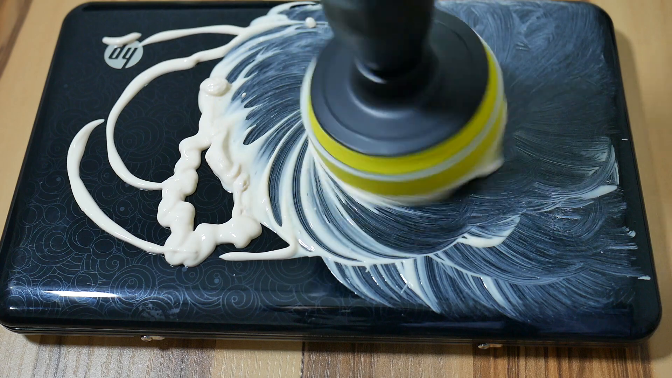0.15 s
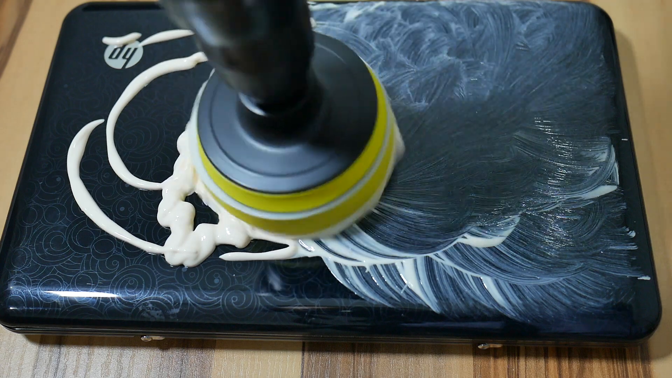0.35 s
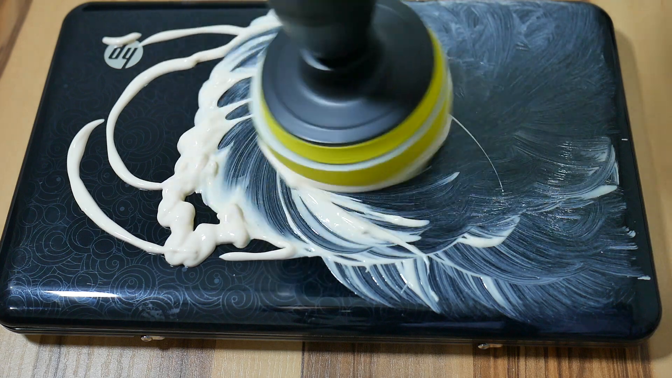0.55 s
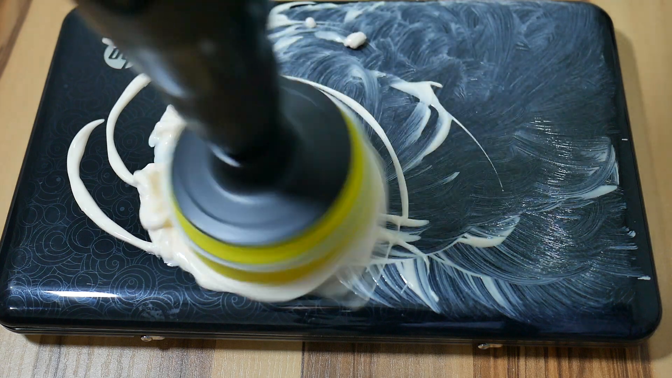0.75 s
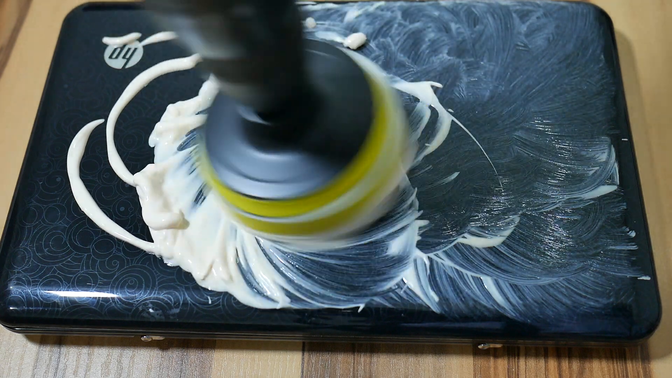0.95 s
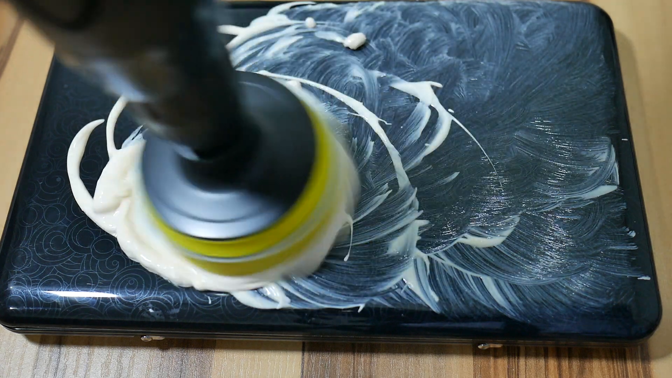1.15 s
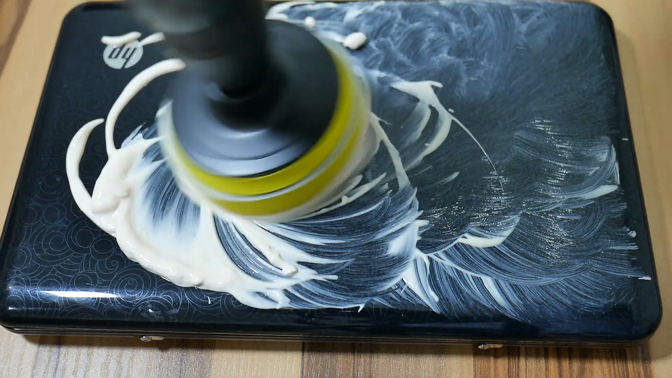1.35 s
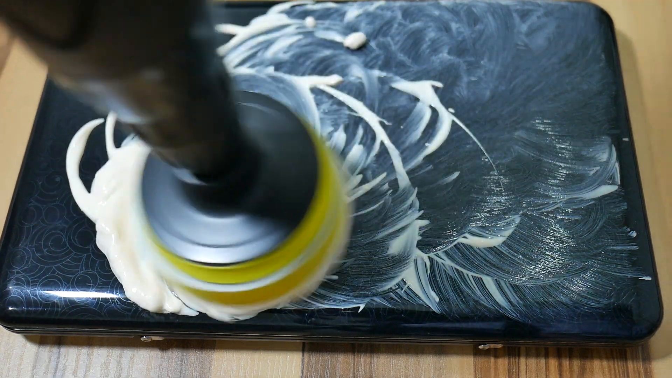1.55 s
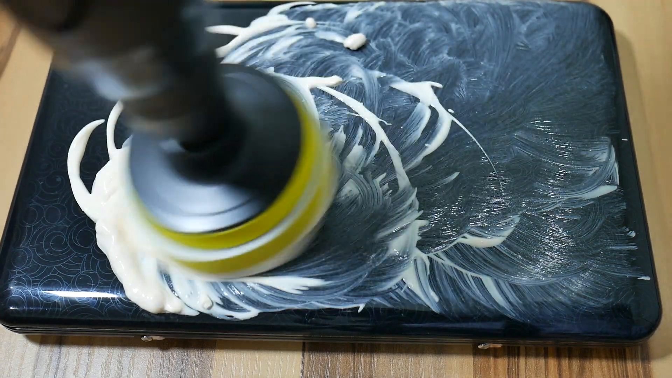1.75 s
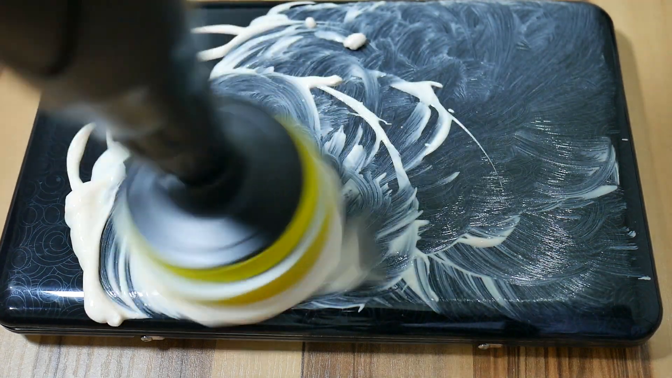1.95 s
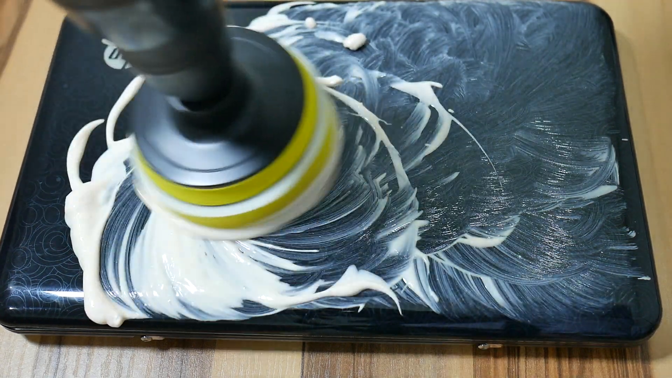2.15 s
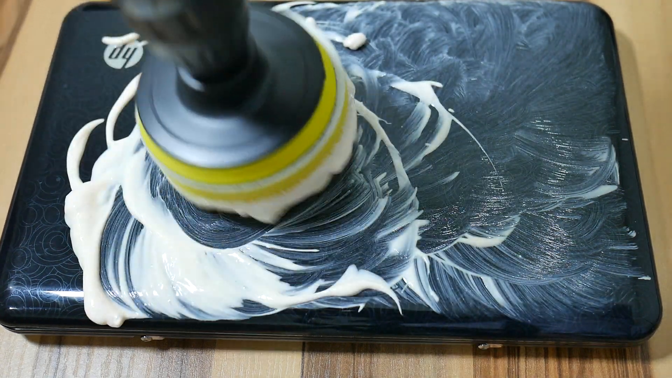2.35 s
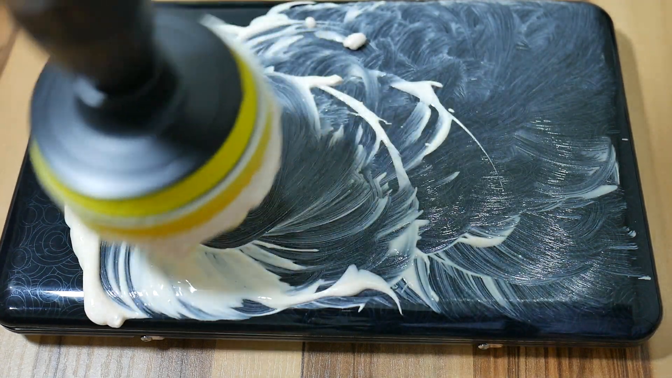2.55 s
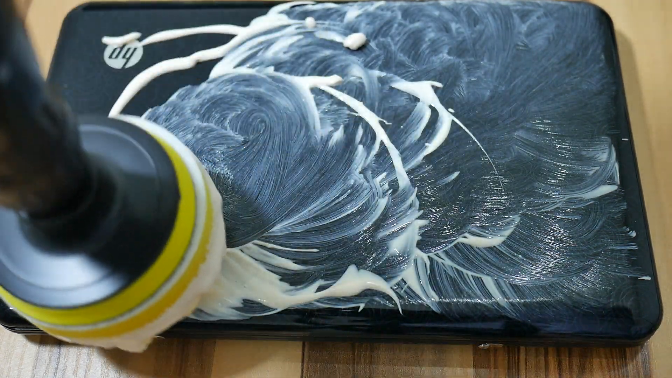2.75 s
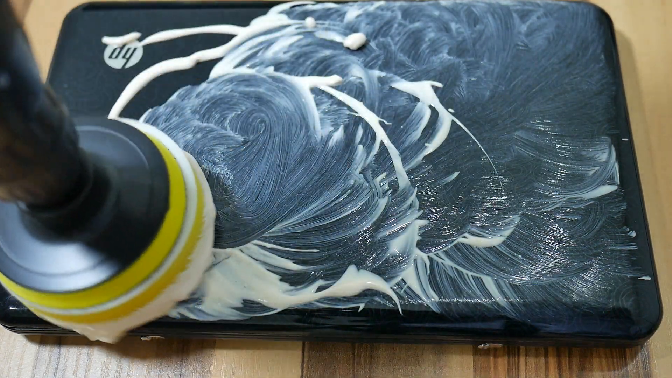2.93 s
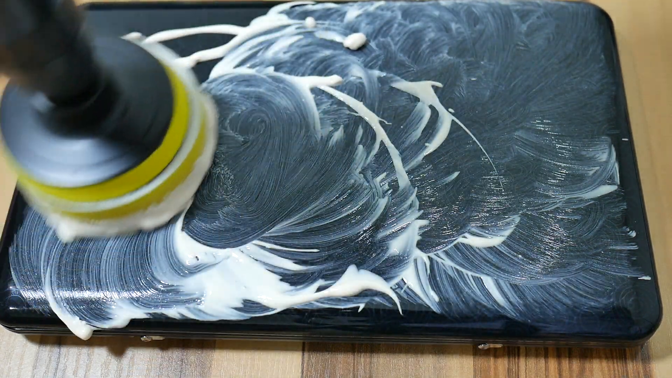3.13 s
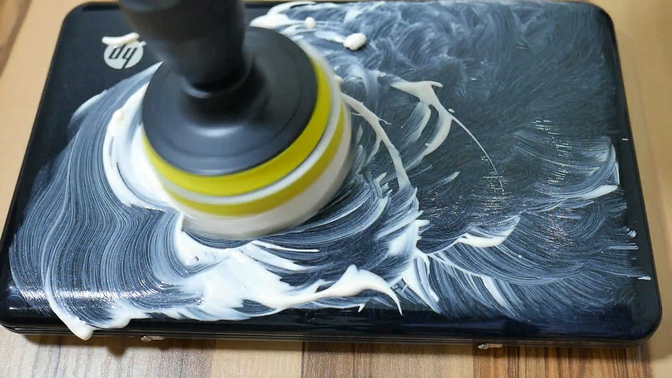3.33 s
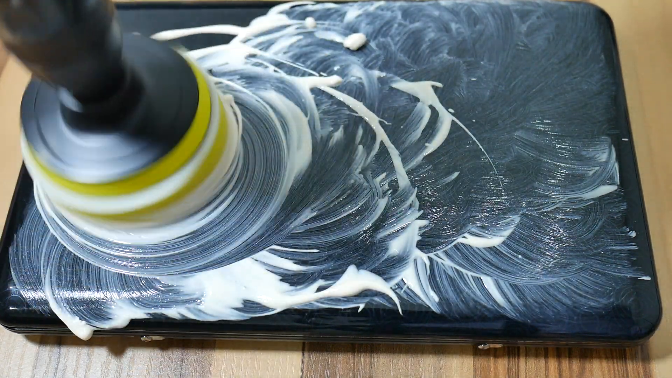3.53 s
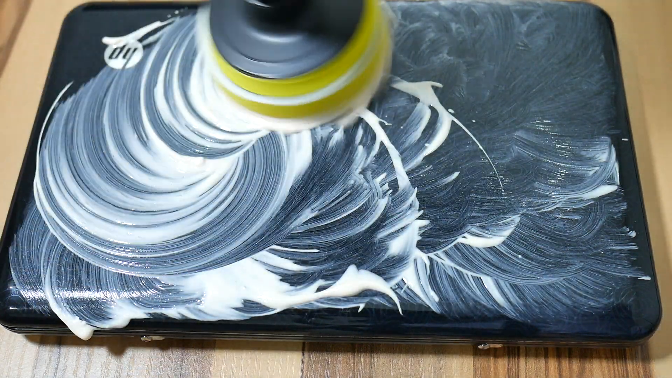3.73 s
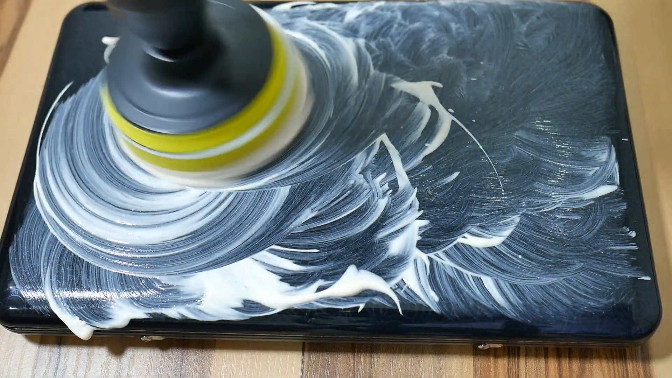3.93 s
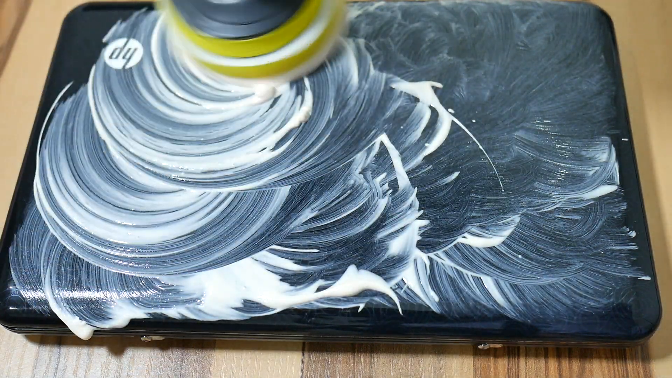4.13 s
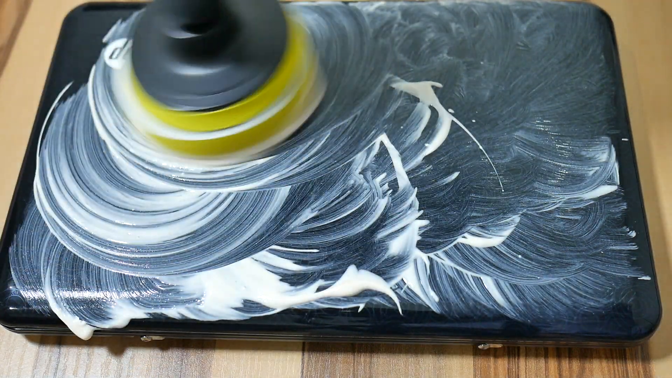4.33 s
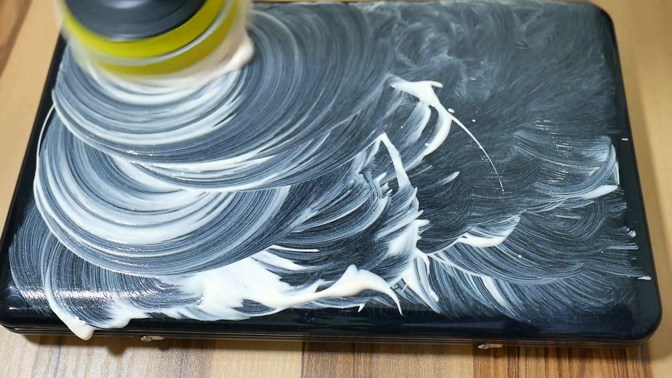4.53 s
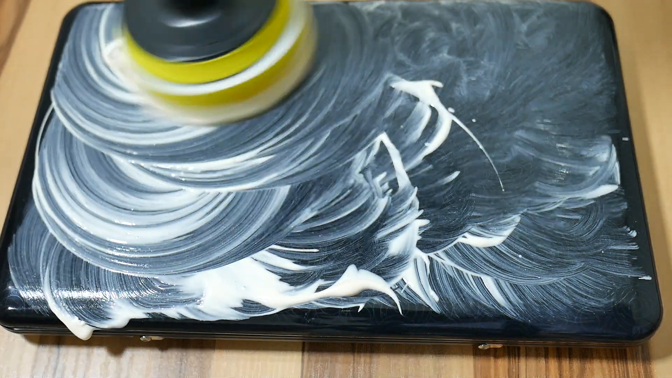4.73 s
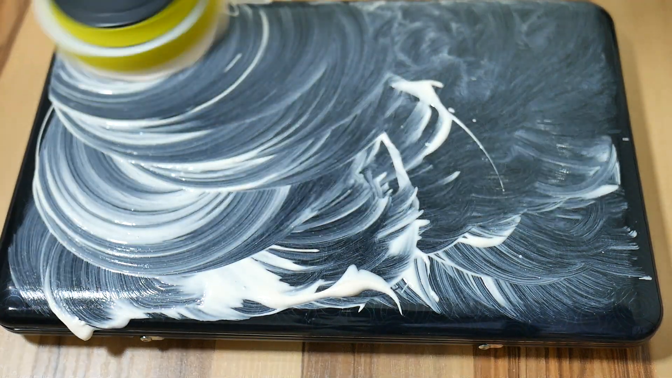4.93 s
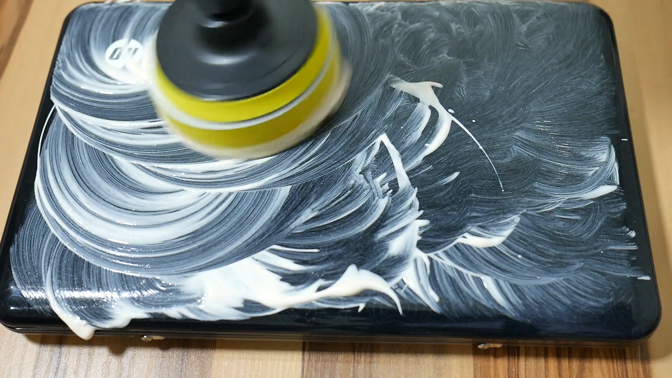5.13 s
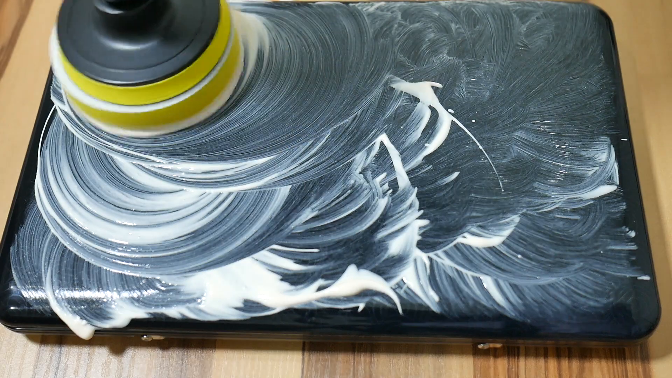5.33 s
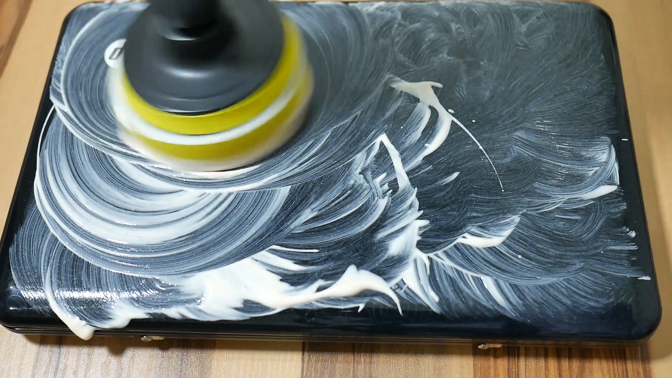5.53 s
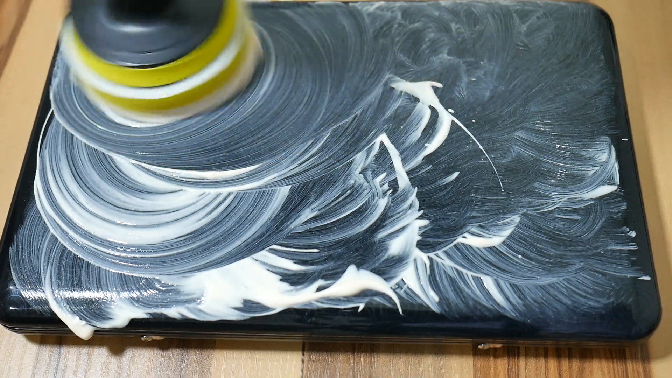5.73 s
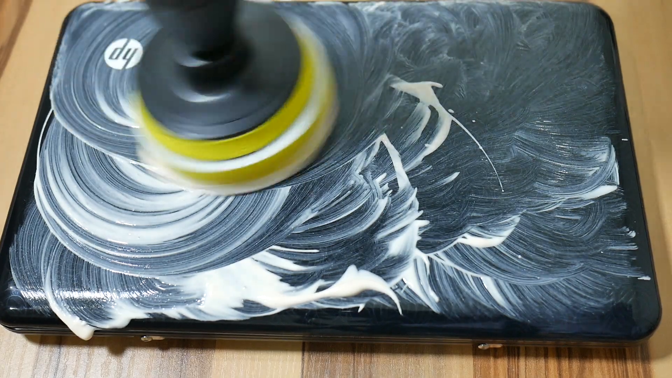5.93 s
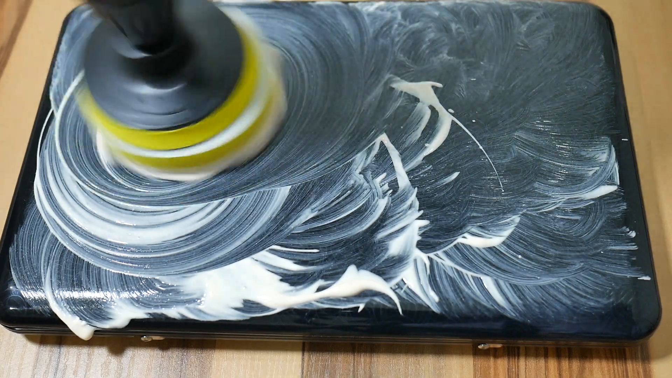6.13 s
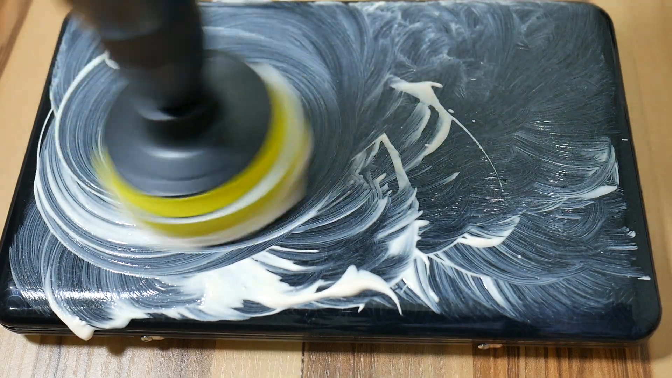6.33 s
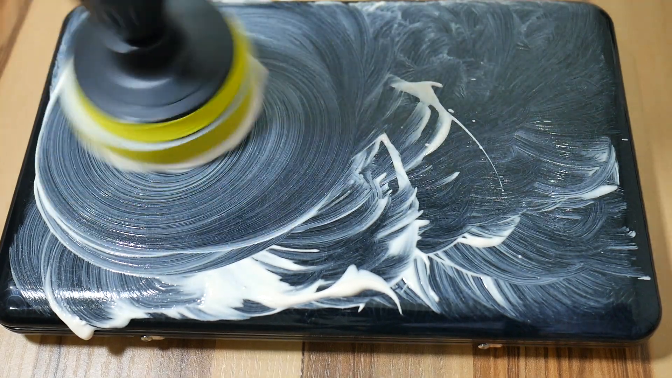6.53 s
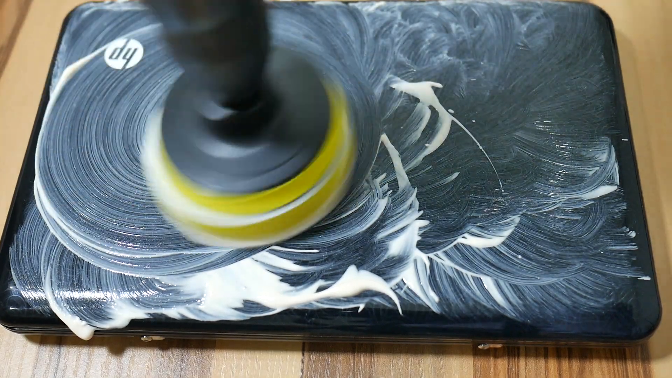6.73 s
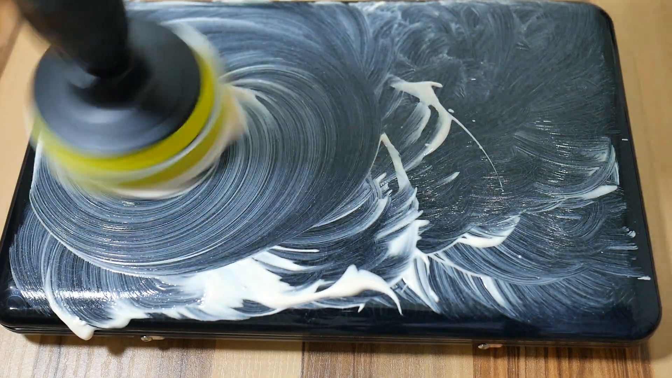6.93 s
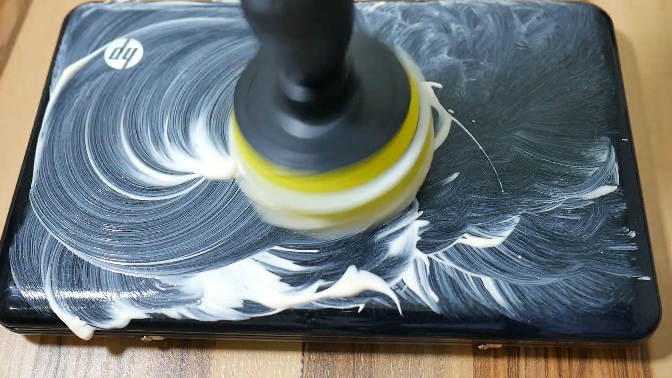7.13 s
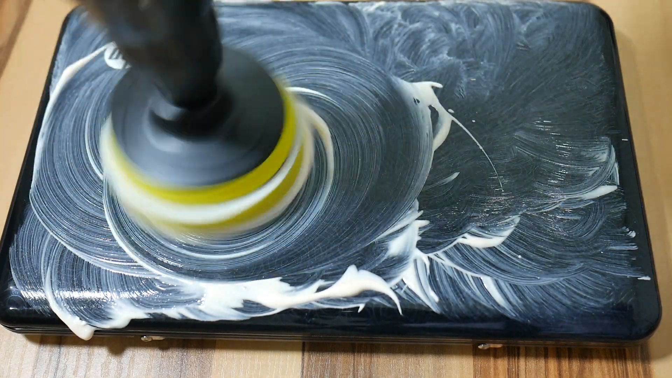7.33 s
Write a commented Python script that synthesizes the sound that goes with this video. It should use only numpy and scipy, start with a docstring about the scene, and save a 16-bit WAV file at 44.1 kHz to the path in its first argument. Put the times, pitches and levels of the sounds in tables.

```python
"""A quiet workshop, stereo microphone close to the bench. A cordless drill spins a foam pad through
polishing paste on a plastic lid. The planetary gearbox whines and rattles, the motor hums, its brushes
and the pad hiss; the speed follows the trigger and sags as the hand leans on the pad. Midway the drill
runs down, clicks, creeps for a moment and starts again at full speed."""
import sys
import numpy as np
from scipy import signal
from scipy.fft import rfft, irfft, next_fast_len
from scipy.io import wavfile
from scipy.ndimage import uniform_filter1d

SR = 44100
rng = np.random.default_rng(int(sys.argv[2]) if len(sys.argv) > 2 else 0)


def digitize_waveform(pressure):
    """Quantize a signal to 16-bit integers and store it at the path in sys.argv[1].

    Rows of a 2-D input are taken as channels; values are limited to [-1, 1].
    """
    field = np.atleast_2d(pressure).T
    bounded = np.clip(field, -1, 1)
    quanta = np.round(bounded * 32767).astype(np.int16)
    wavfile.write(sys.argv[1], SR, quanta)


N = 329868

# gear pitch set by the trigger, before and after the stop: time_s, pitch_hz
FIRST_RUN = [(0, 960), (.182, 971), (.215, 817), (.26, 756), (.57, 748), (.615, 862), (.655, 954),
             (.8, 969), (.975, 982), (1.005, 842), (1.07, 802.5), (1.17, 754), (2.235, 744.2), (2.295, 596),
             (2.38, 541), (2.45, 445)]
SECOND_RUN = [(3.255, 143.2), (3.275, 269.2), (3.295, 544), (3.31, 755), (3.34, 973), (3.37, 1081),
              (3.42, 1123), (3.53, 1105), (3.62, 1112), (3.85, 1098), (5.125, 1085), (5.19, 952.5),
              (5.24, 798.5), (5.31, 746.4), (6.445, 740.8), (6.48, 609), (6.52, 543), (6.695, 535),
              (6.735, 832), (6.85, 1052), (7.1, 1080), (7.25, 1086), (7.34, 949), (7.48, 937)]
# the hand leans on the pad once a stroke: middle_s, length_s, sag_hz (at SLOW_HZ), firmness (0-1)
HAND_PRESSES = [(0.399, 0.29, 33, 0.23), (1.124, 0.17, 6.5, 0.07), (1.516, 0.34, 28.7, 0.42),
                (1.895, 0.44, 18.2, 0.63), (2.211, 0.21, 13.1, 0.74), (3.623, 0.37, 24.5, 1),
                (3.777, 0.17, 22.6, 0.9), (4.078, 0.35, 32, 0.9), (4.491, 0.42, 44.6, 0.43),
                (4.859, 0.15, 14.5, 0.47), (5.379, 0.34, 31, 0.75), (5.691, 0.45, 32.5, 0.89),
                (6.152, 0.4, 33.4, 0.91), (6.432, 0.21, 15.1, 0.61), (6.95, 0.32, 34.4, 1),
                (7.295, 0.11, 19.7, 0.98)]
# tooth harmonics two to seven: level_db, surge_change_db, sideband_share (0-1)
TOOTH_HARMONICS = [(-40, -2.5, 0.38), (-40.5, -11.5, 0.18), (-44, -17, 0.26), (-43, 0.5, 0.42),
                   (-45.5, 0.5, 0.67), (-47, -27, 0.7)]
# harmonics two to six rise and fall against the rest: time_s, gain_db
BALANCE_2 = [(0, -3), (.15, -1), (.25, -10), (.52, -6), (.62, -8), (.9, -1), (1.25, -8), (1.5, -1.5),
             (2.3, -0.5), (3.33, 3.5), (3.45, -5.5), (4.6, -3.5), (5.1, -0.5), (5.35, -4), (5.5, 2),
             (6.4, 1.5), (6.6, -7), (6.76, 3.5), (6.9, -7), (7.05, -8), (7.17, 2.5), (7.3, -5), (7.48, 0)]
BALANCE_3 = [(0, 1), (.18, 2.5), (.25, -3), (.53, 6), (.65, -1), (.95, 0), (1.05, -0.5), (1.25, 2),
             (1.5, 1), (2.2, -1.5), (2.33, 5.5), (3.3, -1), (3.41, -2), (3.53, 0.5), (4.28, 1), (4.42, 5.5),
             (4.58, 8), (4.68, -9), (4.8, 3), (4.93, 7), (5, -10), (5.17, -12), (5.23, 3.5), (5.35, -6),
             (5.65, 4.5), (5.85, -10), (6.05, -3), (6.35, -1), (6.46, -8), (6.55, -1), (6.7, -1), (6.8, -5),
             (6.88, 8.5), (7.08, 2.5), (7.28, 5.5), (7.38, -1), (7.48, 3)]
BALANCE_4 = [(0, 3.5), (1.06, 2), (1.25, -4), (1.9, -9), (2.29, -0.5), (3.29, -5), (3.47, 6), (3.62, 8),
             (3.85, -2.5), (4.05, 1), (4.3, -2), (4.57, 8), (4.66, -19), (5.05, -11), (5.38, 4.5),
             (6.17, -0.5), (6.38, 9), (6.46, 0), (6.52, -16), (6.74, -15), (6.88, 11.5), (7.03, 7),
             (7.17, 12), (7.3, 7), (7.42, 0)]
BALANCE_5 = [(0, 0.5), (.21, 3.5), (.3, -4), (.55, -5), (.62, 3), (.7, 6), (.93, -3), (1.02, 6), (1.2, 0),
             (2.3, -2), (3.3, -4), (3.5, -6.5), (5.05, 4.5), (5.15, -3), (5.25, -9), (5.35, 1), (6.2, 1.5),
             (6.5, 2), (6.76, -7), (6.9, 1.5), (7.25, -3.5), (7.48, -2)]
BALANCE_6 = [(0, -5), (.25, -2), (.5, 4), (.62, -10), (.75, 5), (1, -5), (1.12, 7.5), (1.25, 0), (1.85, 6),
             (2.3, -3), (5.1, 5), (5.25, -6), (5.38, -1), (5.7, 0.5), (6.18, 3.5), (6.4, -2), (6.6, 6),
             (6.75, -5), (7, 0.5)]
# how strongly the gearbox radiates a tooth harmonic: frequency_hz, gain_db
GEARBOX_COLOUR = [(1100, -13.5), (1480, -4), (1950, 0), (2200, 0), (2430, 4), (2950, -4.5), (3280, 0),
                  (3700, -4.5), (3920, 0.5), (4420, -3.5), (4860, 4.5), (5200, 1.5), (5430, -3.5),
                  (5900, -9), (6800, -5.5), (7500, -4)]
# a full press shifts the whine into the upper middle: frequency_hz, gain_db
LOAD_COLOUR = [(1450, -6), (2150, -2), (2800, 11.5), (3500, 11), (4300, 13), (5000, 1.5), (5500, 13),
               (7500, -2)]
# weaker gear partials: gear_multiple, level_db (against the rattle)
GEAR_PARTIALS = [(1.025, -22.5), (8, -14), (9, -18), (10, -21)]
# resonances of the housing, and a narrow dip near 7.8 kHz: centre_hz, width_hz, gain_db
HOUSING_MODES = [(2134, 115, 2), (2645, 250, 1.5), (3270, 270, 1), (3770, 146, -0.5), (4200, 470, 6),
                 (5170, 1100, 6.5), (7230, 230, 6.5), (7800, 120, -11), (8030, 170, 5.5)]
# commutator hum: time_s, level_db
COMMUTATOR_HUM = [(0, -51), (1.2, -47), (2.15, -44.5), (2.3, -48), (3.3, -47), (4.2, -48), (5.1, -55.5),
                  (5.4, -49), (6.4, -53), (6.95, -49.5), (7.48, -52.5)]
# whine of the motor pinion: time_s, level_db
PINION_WHINE = [(0, -59), (1.3, -52), (1.9, -43.5), (2.3, -58), (3.29, -35), (3.42, -34.5), (4.45, -40.5),
                (4.62, -67), (5.2, -55), (5.4, -46.5), (6.35, -39.5), (6.6, -43.5), (7.15, -41), (7.3, -42),
                (7.4, -37.5)]
# armature and bearing tones: shaft_multiple, level_db (against the rattle, at top speed)
ARMATURE_TONES = [(1, -33), (1.6, -31.5), (4, -23), (4.2, -27.5), (5.05, -17.5), (6.03, -15), (11.27, -8),
                  (13.1, -15), (24.1, -16)]
# spectrum of the rubbing parts: frequency_hz, gain_db
RUB_COLOUR = [(71, -56), (150, -45), (250, -31.5), (345, -21), (430, -25.5), (500, -22.5), (585, -16),
              (640, -27), (740, -16.5), (1300, -12), (1900, -6), (2400, -5.5), (4000, -6.5), (4700, -12.5),
              (6500, -13), (8600, -19.5), (9600, -15), (12000, -16), (13000, -19), (15000, -21.5),
              (15800, -26)]
# friction in the first run, the stop and the second run: time_s, hiss_db, pad_db
FIRST_RUB = [(0.0, -40.5, -46.5), (0.49, -42.5, -44.5), (0.61, -39.5, -42.5), (0.94, -41.5, -45),
             (1.11, -41, -41), (1.27, -43, -46), (1.52, -40.5, -40), (1.72, -42.5, -44.5), (1.76, -38, -42),
             (1.97, -42, -39.5), (2.25, -39, -42.5), (2.29, -40.5, -37.5), (2.46, -56, -49.5),
             (2.5, -77, -65), (2.54, -72, -73)]
STOP_RUB = [(2.62, -80, -93), (2.9, -96.5, -82.5), (2.96, -85, -78), (3.0, -63, -56), (3.08, -61, -47.5),
            (3.145, -71, -60), (3.22, -81, -76)]
SECOND_RUB = [(3.238, -75, -54), (3.275, -43, -39), (3.295, -32.5, -26.5), (3.34, -32.5, -34.5),
              (3.43, -38, -37), (3.51, -35, -34), (4.41, -36, -38), (4.69, -40.5, -39.5),
              (4.98, -39.5, -39), (5.47, -40.5, -42), (5.51, -46, -44.5), (5.63, -39, -40.5),
              (5.83, -45.5, -45.5), (5.96, -42.5, -45), (6.0, -39, -41.5), (6.32, -43.5, -45.5),
              (6.44, -39.5, -41), (6.69, -44.5, -44.5), (6.77, -37.5, -46), (6.85, -37.5, -39.5),
              (7.18, -46, -45), (7.22, -40, -47.5), (7.46, -41, -45)]
# spectrum of the still room: frequency_hz, gain_db
AIR_COLOUR = [(25, -42), (42, -25), (56, -12), (80, -19), (130, -9), (213, -6.5), (430, -5), (560, -8.5),
              (2000, -30.5), (9500, -32), (15000, -55)]
# mains hum in the room: time_s, level_db
MAINS_HUM = [(0, -84.5), (2.2, -79.5), (2.5, -75.5), (3.2, -70), (3.6, -87.5), (6.5, -77), (7.48, -95)]
# short rasps, each in one resonance: middle_s, length_s, centre_hz, width_hz, level_db
RASP_SWELLS = [(0.377, .12, 5050, 800, -36), (1.5, 0.36, 5130, 700, -43), (1.851, .3, 4496, 900.4, -38),
               (2.15, .25, 5150, 700, -42), (4.851, .8, 7398, 450, -42), (5.677, 0.64, 7330, 350, -46.5),
               (6.25, 0.49, 7370, 350, -48), (6.925, .3, 7327, 300.9, -43)]
# gear overtones whistle up: middle_s, length_s, gear_multiple, blur_hz, level_db
WHISTLE_SWELLS = [(1.12, 0.33, 8.9, 120, -60), (1.95, 1, 9.2, 59.98, -48.5),
                  (2.121, 0.73, 7.65, 110, -50.5), (4.849, 0.55, 12, 419.7, -45),
                  (4.899, 0.62, 7, 199.4, -49.5), (4.899, 0.58, 8.8, 350, -44),
                  (5.638, 0.28, 15.1, 801, -43), (6.069, 0.25, 14.9, 800, -49), (6.395, .16, 15, 799, -51),
                  (6.5, 0.16, 11, 259.5, -39.5), (6.6, 0.18, 7.8, 70.3, -37),
                  (6.592, 0.12, 3.65, 50, -39.5), (6.86, 0.37, 11.5, 300, -46),
                  (7.15, .5, 11.25, 260.2, -47)]
# trigger, chuck and gear backlash: start_s, level_db, ring_hz
STOP_CLICKS = [(2.434, -27.5, 2390), (2.437, -21, 1230), (2.443, -25, 4080), (2.498, -37, 1730),
               (2.891, -37.5, 11100), (2.932, -37, 3920), (2.937, -32, 3300), (2.945, -49, 3300),
               (2.975, -36, 1130), (3.16, -38, 1413), (3.231, -29, 2784), (3.245, -29, 4120)]
# the motor creeps under a half-pressed trigger: time_s, whistle_db, scrape_db
CREEP_LEVELS = [(2.965, -130, -73), (2.98, -75, -67), (2.995, -72, -44), (3.03, -71, -52),
                (3.06, -73, -41.5), (3.095, -75, -41.5), (3.13, -92, -56), (3.22, -125, -67),
                (3.243, -63, -49), (3.275, -67, -33), (3.32, -130, -70)]
# what rings while it creeps: centre_hz, width_hz, gain_db
SCRAPE_MODES = [(1070, 65, -1.5), (1280, 210, -3), (2800, 280, -5), (4040, 230, -3)]
# reflections from bench and walls in the side signal: frequency_hz, gain_db
SIDE_COLOUR = [(60, 2), (200, -36), (400, -12), (700, -16.5), (1300, -16.5), (2400, -13), (4400, -19.5),
               (8000, -39), (15000, -18.5)]
# direct sound at the microphone, by frequency: frequency_hz, left_over_right_db
MIC_BALANCE = [(60, -3), (300, 5), (700, 4), (1200, 3), (2700, 6.5), (4200, 7), (6400, 6), (10000, 4.5),
               (15000, 6)]
# where the drill is, added to that balance: time_s, left_over_right_db
DRILL_PAN = [(0, -6), (.7, -4.5), (1.7, -4.5), (2.7, -4), (4, -5.5), (5.3, -5.5), (6.3, -5.5), (7.48, -6.5)]

SLOW_HZ = 750   # gear pitch at the slow working speed
SHAFT_PER_GEAR, CARRIER_PER_GEAR = 19 / 60, 1 / 15   # turns per cycle of the gear pitch
COMMUTATOR_BEATS, PINION_TEETH = 3, 12   # per shaft turn
FULL_SURGE_HZ_PER_S, FULL_SLACK_HZ_PER_S = 2620, 3700   # speeding up at full current; slowing, teeth loose


def from_db(db):
    """Decibels to amplitude."""
    return 10 ** (np.asarray(db) / 20)


def rms_one(x):
    """Scales x to rms 1."""
    return x / np.sqrt(np.mean(x ** 2) + 1e-20)


def in_time(rows):
    """Each column of a curve at every sample."""
    time_s, *columns = np.transpose(rows)
    return [np.interp(np.arange(N) / SR, time_s, column) for column in columns]


def at_hz(points, hz):
    """A spectrum read on a log-frequency axis."""
    points = np.array(points)
    return np.interp(np.log(hz + 1e-3), np.log(points[:, 0]), points[:, 1])


def coloured(x, gain):
    """Filters x by a gain given as a function of frequency."""
    size = next_fast_len(N + SR // 10)
    return irfft(rfft(x, size) * gain(np.arange(size // 2 + 1) * SR / size), size)[..., :N]


def drift(rate_hz):
    """Smooth random wander with spread 1."""
    pole = np.exp(-40 * np.pi * rate_hz / SR)
    slow = signal.lfilter([1], [1, -2 * pole, pole * pole], rng.standard_normal(N // 20 + 4002))[4000:]
    return np.interp(np.arange(N) / 20, np.arange(len(slow)), rms_one(slow))


def tone(turns, blur, blur_hz):
    """A partial of rms 1, a share of which is scattered into a narrow skirt."""
    blur = np.clip(blur, 0, 1)
    angle = 2 * np.pi * turns
    in_phase = np.sqrt(2 * (1 - blur)) + np.sqrt(blur) * drift(blur_hz)
    return in_phase * np.cos(angle) + np.sqrt(blur) * drift(blur_hz) * np.sin(angle)


def throb(turns, depth):
    """Swelling once a turn, never quite evenly; rms 1."""
    return rms_one(1 + depth * np.cos(2 * np.pi * (turns + .15 * drift(3))))


def swell(middle_s, length_s):
    """A smooth bump of height 1 around a moment."""
    return np.cos(np.pi * np.clip((np.arange(N) / SR - middle_s) / length_s, -.5, .5)) ** 2


def snaps(per_s, decay_s, size):
    """An envelope of small catches and sparks: each jumps up and dies away; rms 1."""
    kicks = (rng.random(N) < per_s / SR) * np.minimum(rng.exponential(1, N), 3)
    return rms_one(1 + size * signal.lfilter([1], [1, -np.exp(-1 / (decay_s * SR))], kicks + 1e-18))


def resonance(hz, centre_hz, width_hz):
    """A resonant peak of height 1."""
    return 1 / (1 + (2 * (hz - centre_hz) / width_hz) ** 2)


def housing_db(hz):
    """The resonances of the housing, and the narrow dip near 7.8 kHz, at these frequencies."""
    return sum(db * resonance(hz, centre_hz, width_hz) for centre_hz, width_hz, db in HOUSING_MODES)


def planets(carrier, share):
    """The circling planets move a share of a line into two close sidebands, which beat; rms 1."""
    return np.sqrt(1 - share) + 1j * np.sqrt(2 * share) * np.cos(np.pi * carrier + .6 * drift(3))


def gears(turns, pitch_hz, load, surge, slack, fade_db, rattle_db):
    """Tooth contacts whine; play in the teeth makes the lines rasp, a firm press cleans them."""
    play = np.maximum(slack, surge)
    turns = turns + 0.013 * drift(61) + 0.041 * play * drift(76)
    carrier = turns * CARRIER_PER_GEAR
    effort_db = fade_db + 0.53 * (rattle_db - np.median(rattle_db))
    rasp_db = -12.5 - 2.6 * load + 11 * play - 0.5 * np.log2(pitch_hz / SLOW_HZ)
    balances = (BALANCE_2, BALANCE_3, BALANCE_4, BALANCE_5, BALANCE_6)
    balance_db = {order: in_time(rows)[0] for order, rows in enumerate(balances, 2)}
    whine = np.zeros(N)
    for order, (base_db, surge_db, share) in enumerate(TOOTH_HARMONICS, 2):
        hz = order * pitch_hz
        level_db = base_db + effort_db + surge_db * surge + balance_db.get(order, 0)
        colour_db = at_hz(GEARBOX_COLOUR, hz) + load * at_hz(LOAD_COLOUR, hz)
        beating = planets(carrier, share)
        phase = 2 * np.pi * (order * turns + 0.052 * drift(13.5))
        line = np.sqrt(2) * np.real(beating * np.exp(1j * phase))
        rasp = from_db(rasp_db + 0.99 * order) * tone(order * turns, blur=1, blur_hz=71)
        chatter_db = slack * (0.5 * order - 2 * np.clip(drift(59.6), -3, 1))
        wander_db = 2.5 * drift(18.7)
        whine += from_db(level_db + colour_db + chatter_db + wander_db) * (line + rasp)
    partials = sum(from_db(db) * tone(multiple * turns, blur=0.66, blur_hz=44.7)
                   for multiple, db in GEAR_PARTIALS)
    whine += from_db(rattle_db) * coloured(partials, lambda hz: from_db(housing_db(hz)))
    shudder = rms_one(from_db(1.42 * drift(45)))   # the pad's uneven drag shakes all lines together
    contact = from_db(-2.5 * slack)   # loose teeth whine less
    return whine * shudder * throb(3 * carrier, depth=0.085) * contact


def motor(shaft, pitch_hz, load, surge, fade_db, rattle_db, low_cut_hz=683):
    """The commutator hums, louder under current; the pinion whines; armature and bearings sing along."""
    hum_db, = in_time(COMMUTATOR_HUM)
    hum_blur = 0.08 + 0.96 * surge + 0.67 * np.maximum(pitch_hz / SLOW_HZ - 1, 0)
    hum = from_db(hum_db + 10 * surge) * tone(COMMUTATOR_BEATS * shaft, hum_blur, blur_hz=34.4)
    # the housing radiates little bass
    hum = coloured(hum, lambda hz: 1 / np.hypot(1, (low_cut_hz / (hz + 1)) ** 10))
    pinion_hz = PINION_TEETH * SHAFT_PER_GEAR * pitch_hz
    pinion_db = in_time(PINION_WHINE)[0] + fade_db + 0.43 * load * at_hz(LOAD_COLOUR, pinion_hz)
    pinion = from_db(pinion_db) * tone(PINION_TEETH * shaft, blur=0.67, blur_hz=30)
    armature = sum(from_db(db) * tone(multiple * shaft, blur=0.68, blur_hz=6.7)
                   for multiple, db in ARMATURE_TONES)
    armature *= from_db(rattle_db) * (pitch_hz / pitch_hz.max()) ** 1.3
    bearing_growl = from_db(hum_db - 13.5) * tone(2.52 * shaft, blur=0.76, blur_hz=11)
    return hum + bearing_growl + pinion + armature


def rub(drive, band_hz, grain_db, grain_hz):
    """Countless tiny contacts of uneven strength excite one range of the housing; rms 1."""
    low_hz, high_hz = band_hz
    contacts = drive * rng.standard_normal(N) * from_db(grain_db * drift(grain_hz))
    band = lambda hz: 1 / np.sqrt((1 + (low_hz / (hz + 1)) ** 14) * (1 + (hz / high_hz) ** 14))
    return rms_one(coloured(contacts, lambda hz: from_db(at_hz(RUB_COLOUR, hz) + housing_db(hz)) * band(hz)))


def friction(turns, octaves, hiss_db, pad_db, rattle_db):
    """The lid rumbles, pad and paste swish, loose gears rattle, the brushes hiss more with speed."""
    knocking = throb(turns * CARRIER_PER_GEAR, depth=0.021)
    catching = knocking * snaps(per_s=240, decay_s=0.0017, size=.27)
    spitting = knocking * snaps(per_s=120, decay_s=0.0054, size=.22)
    rumble = from_db(pad_db - 21 + 0.5 * octaves) * rub(1, (170, 650), grain_db=2, grain_hz=40.1)
    lid = from_db(pad_db - 12.5) * rub(catching, (677, 1210), grain_db=2.5, grain_hz=150)
    pad = from_db(pad_db - 1.2) * rub(catching, (1180, 2490), grain_db=0.5, grain_hz=302)
    rattle = from_db(rattle_db - 1.5) * rub(catching, (2390, 4420), grain_db=1, grain_hz=352)
    paste_db, brush_db = hiss_db - 0.07 - 0.64 * octaves, hiss_db - 2 + 3.7 * octaves
    paste = from_db(paste_db) * rub(spitting, (4730, 8070), grain_db=2.5, grain_hz=390)
    brushes = from_db(brush_db) * rub(spitting, (7670, 17000), grain_db=1, grain_hz=902)
    return rumble + lid + pad + rattle + paste + brushes


def room_tone(air_db=-68, spread=0.86, mains_hz=118):
    """Still air all round the microphone and a mains hum in the centre."""
    common, left, right = coloured(rng.standard_normal((3, N)), lambda hz: from_db(at_hz(AIR_COLOUR, hz)))
    air = from_db(air_db) * rms_one(common + spread * np.array([left, right]))
    mains = tone(mains_hz * np.arange(N) / SR, blur=0.33, blur_hz=1.9)
    return air + from_db(in_time(MAINS_HUM)[0]) * mains


def pressing():
    """Each press of the hand swells and eases: the pitch it costs and the firmness it gives."""
    return sum(np.outer([sag_hz, firmness], swell(middle_s, length_s))
               for middle_s, length_s, sag_hz, firmness in HAND_PRESSES)


def rasps():
    """The rubbing roughens for a moment and sets one resonance ringing."""
    grit = rng.standard_normal(N) * snaps(per_s=270, decay_s=.002, size=.4)
    out = np.zeros(N)
    for middle_s, length_s, centre_hz, width_hz, db in RASP_SWELLS:
        ring = rms_one(coloured(grit, lambda hz: resonance(hz, centre_hz, width_hz)))
        out += from_db(db) * swell(middle_s, length_s) * ring
    return out


def whistles(turns):
    """Airy gear overtones come and go, gliding with the speed."""
    return sum(from_db(db) * swell(middle_s, length_s) * tone(multiple * turns, blur=1, blur_hz=blur_hz)
               for middle_s, length_s, multiple, blur_hz, db in WHISTLE_SWELLS)


def clicks(decay_s=0.0019, tail_s=0.063, tail_db=-22, ring_db=4, gain_db=-15.5):
    """Trigger, chuck and gear backlash snap: a short crack with one broad ring and a faint tail."""
    out, t = np.zeros(N), np.arange(SR // 8) / SR
    envelope = np.exp(-t / decay_s) + from_db(tail_db) * np.exp(-t / tail_s)
    band = signal.butter(2, [800, 7500], "band", fs=SR, output="sos")
    for start_s, level_db, ring_hz in STOP_CLICKS:
        crack = signal.sosfilt(band, rng.standard_normal(len(t)))
        ring = signal.lfilter(*signal.iirpeak(ring_hz, 3, fs=SR), crack)
        click = envelope * (rms_one(crack) + from_db(ring_db) * rms_one(ring))
        start = round(start_s * SR)
        out[start:start + len(t)] += from_db(level_db + gain_db) * click
    return out


def creep(chop_hz=12130):
    """Chopped current makes the windings whistle while the gears scrape slowly round."""
    whistle_db, scrape_db = in_time(CREEP_LEVELS)
    whistle = from_db(whistle_db) * tone(chop_hz * np.arange(N) / SR, blur=0.74, blur_hz=70)
    slips = rng.standard_normal(N) * snaps(per_s=190, decay_s=0.00058, size=1.9)
    scrape = sum(from_db(db) * rms_one(signal.lfilter(*signal.iirpeak(hz, hz / width_hz, fs=SR), slips))
                 for hz, width_hz, db in SCRAPE_MODES)
    return whistle + from_db(scrape_db - 7.5) * scrape


def workshop(x, early_s=0.0047, t60_s=0.89, tail_db=-20, wall_cut_hz=1700):
    """At the microphone: direct sound, widened by early reflections, then a tail dulled by the walls."""
    t = np.arange(SR // 2) / SR
    early, late_left, late_right = rng.standard_normal((3, len(t)))
    echo = lambda response: signal.fftconvolve(x, response / np.linalg.norm(response))[:N]
    side = coloured(echo(early * np.exp(-t / early_s)), lambda hz: from_db(at_hz(SIDE_COLOUR, hz) + 2.5))
    tail = np.array([echo(late * from_db(-60 * t / t60_s)) for late in (late_left, late_right)])
    tail = coloured(tail, lambda hz: 1 / np.hypot(1, hz / wall_cut_hz))
    left_right = np.array([[1], [-1]])
    direct = coloured(x, lambda hz: from_db(left_right * at_hz(MIC_BALANCE, hz) / 2))
    pan = from_db(left_right * in_time(DRILL_PAN)[0] / 2)
    return direct * pan + left_right * side + from_db(tail_db) * tail


def scene():
    """Trigger and hand pressure set one rotation that drives gears, motor and rattle."""
    free_hz, = in_time(list(FIRST_RUN) + list(SECOND_RUN))
    sag_hz, press = pressing()
    sag_hz = sag_hz * (SLOW_HZ / free_hz) ** 2.05   # a press slows the motor less at high speed
    pitch_hz = uniform_filter1d(free_hz, size=SR // 50) - sag_hz
    turns, octaves = np.cumsum(pitch_hz) / SR, np.log2(pitch_hz / SLOW_HZ)
    hiss_db, pad_db = in_time(list(FIRST_RUB) + list(STOP_RUB) + list(SECOND_RUB))
    rattle_db = hiss_db + 4 + 0.3 * press + 0.5 * octaves
    running, = in_time([(2.28, 1), (2.43, 0), (3.26, 0), (3.29, 1)])   # no whine or hum between the runs
    hz_per_s = uniform_filter1d(np.gradient(pitch_hz) * SR, size=SR // 20)
    surge = np.clip(hz_per_s / FULL_SURGE_HZ_PER_S, 0, 1)   # speeding up draws current
    slack = np.clip(-hz_per_s / FULL_SLACK_HZ_PER_S, 0, 1)   # slowing lets the teeth lose contact
    fade_db = 0.5 * np.minimum(octaves, 0)   # the whine fades a little below slow speed
    # a press colours the whine far less at high speed
    load = press * (1 - slack) * (SLOW_HZ / np.maximum(pitch_hz, SLOW_HZ)) ** 6.3
    whine = gears(turns, pitch_hz, load, surge, slack, fade_db, rattle_db)
    hum = motor(turns * SHAFT_PER_GEAR, pitch_hz, load, surge, fade_db, rattle_db)
    rubbing = friction(turns, octaves, hiss_db, pad_db, rattle_db)
    drill = running * (whine + hum + whistles(turns)) + clicks() + creep()
    return workshop(drill) + workshop(rubbing + rasps()) + room_tone()


def record(dry):
    """The top is cut steeply at 15.7 kHz."""
    return coloured(dry, lambda hz: np.clip((15700 - hz) / 300 + .5, 0, 1))


dry = scene()
out = record(dry)
digitize_waveform(out)
```